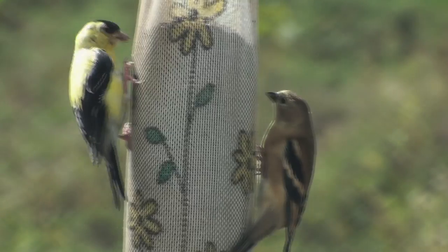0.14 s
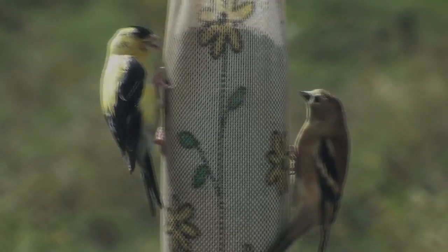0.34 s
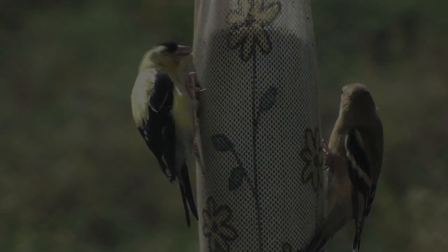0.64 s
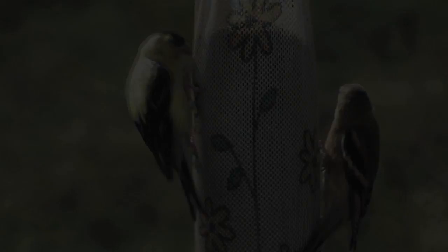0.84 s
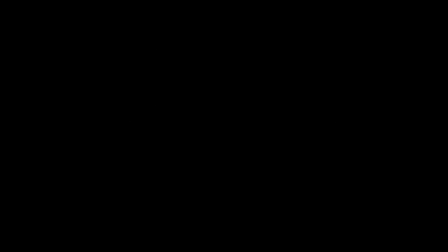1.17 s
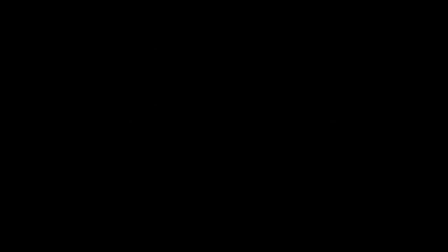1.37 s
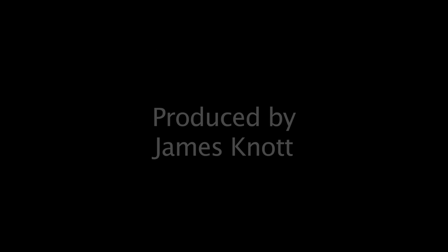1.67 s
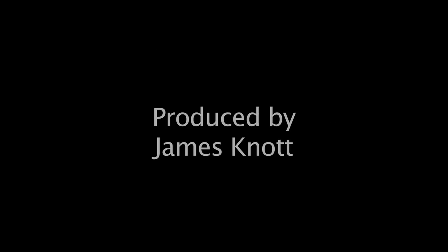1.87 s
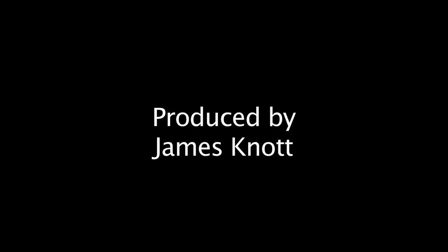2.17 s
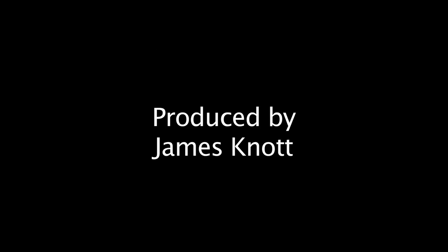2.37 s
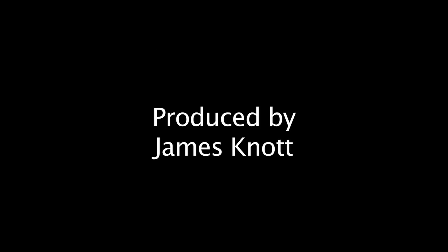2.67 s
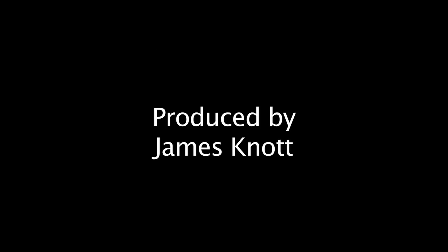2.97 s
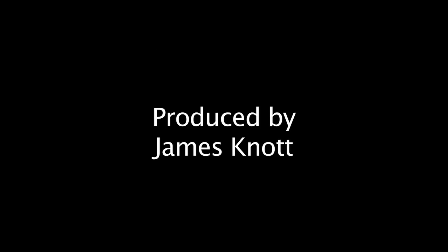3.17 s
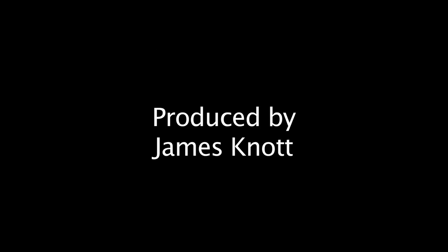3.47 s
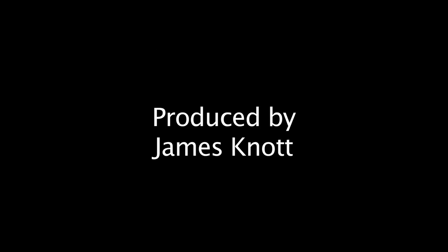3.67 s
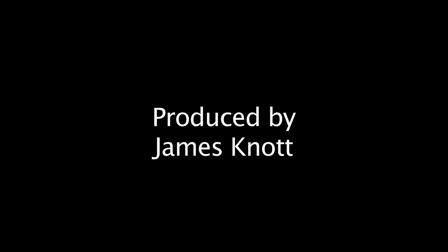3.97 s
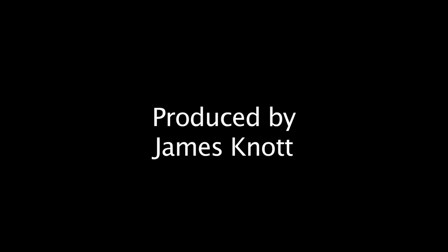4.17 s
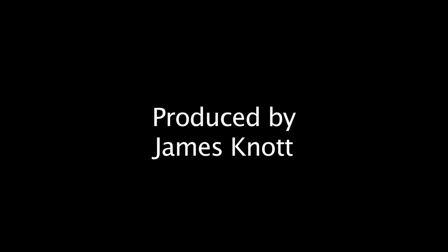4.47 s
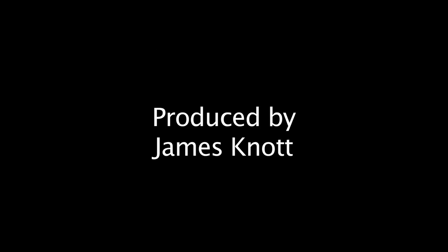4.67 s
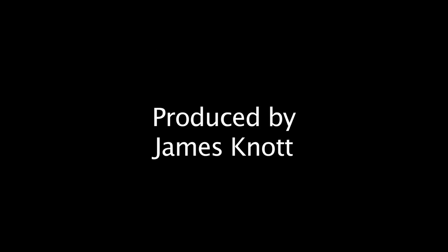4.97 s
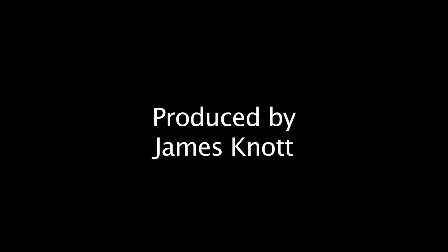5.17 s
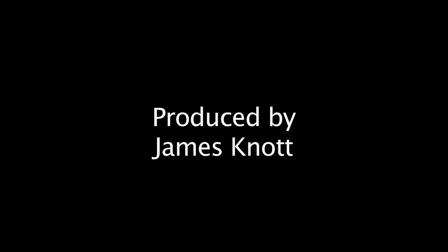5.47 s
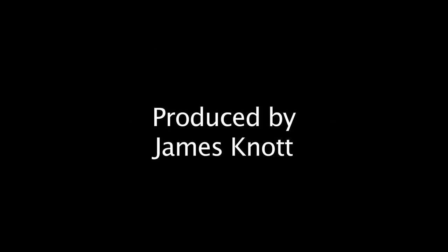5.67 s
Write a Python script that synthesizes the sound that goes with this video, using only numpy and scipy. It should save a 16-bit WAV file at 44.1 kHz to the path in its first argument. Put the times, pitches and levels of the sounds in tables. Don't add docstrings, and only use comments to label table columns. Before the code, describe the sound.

Summer meadow insects trill steadily while early wind buffets the microphone; wooden perch knocks, claw shuffling and brief finch calls follow.

```python
import sys
import numpy as np
from scipy import signal
from scipy.fft import rfft, irfft
from scipy.io import wavfile
from scipy.ndimage import uniform_filter1d

SR = 44100
rng = np.random.default_rng(int(sys.argv[2]) if len(sys.argv) > 2 else 0)


def how_loud(loudness_db):
    steps = np.asarray(loudness_db, float) / 20
    return 10 ** steps


def waveform_to_disk(signal):
    frames = np.transpose(np.atleast_2d(signal))
    scaled = np.clip(frames, -1, 1) * 32767
    samples = np.round(scaled).astype(np.int16)
    wavfile.write(sys.argv[1], SR, samples)


N = 256662
T = np.arange(N) / SR


def evened(x):
    return x / np.sqrt(np.mean(x ** 2) + 1e-20)


def add(mix, s, sound):
    part = mix[round(s * SR):][:len(sound)]
    part += sound[:len(part)]


def curve(table):
    return how_loud(np.interp(T, *np.transpose(table)))


def slow(length, size):
    return evened(uniform_filter1d(uniform_filter1d(rng.standard_normal(length), size), size))


def noise(shape, patchy_db, size):
    frames, hz = N // (size // 4) + 5, np.fft.rfftfreq(size, 1 / SR)
    a, b, patches = rng.standard_normal((frames, len(hz), 3)).T
    patches = uniform_filter1d(patches, size=5, axis=0)
    patches = evened(uniform_filter1d(patches, size=6, axis=1))
    f, db = np.transpose(shape)
    colour_db = np.interp(np.log(hz + 1), np.log(f + 1), db, left=-90, right=-90)
    z = (a + 1j * b) * how_loud(colour_db[:, None] + patchy_db * patches)
    return evened(signal.istft(z, nperseg=size, noverlap=size - size // 4)[1][:N])


def band(x, hz, width_hz):
    edges_hz = [hz - width_hz / 2, hz + width_hz / 2]
    return evened(signal.sosfilt(signal.butter(2, edges_hz, "band", fs=SR, output="sos"), x))


def phase(hz):
    return 2 * np.pi * np.cumsum(hz) / SR


def stroke(top_hz, rise_hz, lead_s, fall_hz, tail_s, shimmer):
    t = np.arange(-lead_s, tail_s, 1 / SR)
    swell_s = [-lead_s, .004 - lead_s, 0.29 * tail_s, 0.73 * tail_s, tail_s]
    swell = np.interp(t, swell_s, [0.093, 0.77, 1, 0.47, 0.092])
    hz = top_hz - np.where(t < 0, rise_hz * (t / lead_s) ** 2, fall_hz * (t / tail_s) ** 2)
    return swell * shimmer[:len(t)] * np.sin(phase(hz))


def stroke_times(rows, per_s):
    s = np.transpose(rows)[0]
    turns = np.cumsum(np.round(np.diff(s, prepend=s[0]) * per_s))
    return np.interp(np.arange(turns[-1] + 1), turns, s)


def crowd(per_s=70):
    out = np.zeros(N)
    for when, tune, force in rng.random((round(per_s * N / SR), 3)):
        chirp = stroke(7500 + 1150 * tune, 130, 0.0055, 660, 0.0118, np.ones(2000))
        add(out, when * N / SR, how_loud(4.0 * force) * chirp)
    return evened(out)


FADE_S = (1.0, 1.76)
# time in seconds, level in dB.
CHORUS = [(0, -48), (.32, -53), (1.1, -50), (1.78, -54), (2.28, -52), (4.21, -53), (4.85, -54.5),
          (5.32, -53), (5.82, -55.5)]
# frequency in Hz, level in dB.
NEAR_MEADOW = [(4000, -50), (6800, -23), (7750, 0.5), (8470, 1), (8780, 3.5), (9000, -20), (10000, -34),
               (13000, -72), (22000, -120)]
FAR_MEADOW = [(4000, -44), (6800, -2.5), (6890, -23), (7000, -11), (7500, 1.5), (8040, 4), (8550, 1.5),
              (9150, -17), (10000, -18), (13000, -20), (22000, -120)]
# start in seconds, end in seconds, level in dB.
FAINT = [
    (0, 1.1, -65),
    (4.3, 5.2, -73.5),
]


def chorus():
    second = np.interp(T, FADE_S, [0, 1])
    leader = 7
    beats = stroke_times((LOW_SONGS + HIGH_SONGS)[leader], STROKES_PER_S[leader])
    beat = np.interp(T, beats, np.arange(len(beats)))
    throb = how_loud(3.2 * np.cos(2 * np.pi * (beat - .5)))
    high = np.sqrt(1 - second) * evened(throb * noise(NEAR_MEADOW, 0.57, size=256))
    high += np.sqrt(second) * noise(FAR_MEADOW, 2.3, size=256)
    high = evened(high + .55 * crowd())
    low = band(rng.standard_normal(N), 4220, 460)
    faint, fade_db_per_s = 0, 17
    for start_s, end_s, db in FAINT:
        outside_s = np.maximum(np.maximum(start_s - T, T - end_s), 0)
        faint = faint + how_loud(db - fade_db_per_s * outside_s)
    return curve(CHORUS) * high + faint * low


# frequency in Hz, density in dB per Hz.
BUFFET = [(10, -24), (22, -1), (40, 1), (62, 2.5), (100, -3), (150, -11), (200, -22.5), (260, -52)]
FLUTTER = [(110, -7), (140, -1), (220, -7.5), (330, -10.5), (500, -16.5), (800, -23.5), (1200, -44)]
# time in seconds, level in dB.
BREEZE = [(0, -46), (1.15, -46), (1.4, -42.5), (1.7, -52), (2.4, -56.5), (3, -57), (3.66, -54),
          (4.0, -52.5), (4.25, -62.5), (4.9, -54), (5.7, -62)]
# centre in seconds, half width in seconds, peak in dB, flutter relative to it in dB.
GUSTS = [(0, 0.063, -36, -15.5), (.145, 0.055, -28.5, -10), (.27, 0.036, -31.5, -6),
         (0.391, 0.065, -30.5, -11), (.46, 0.08, -41, 1), (.54, 0.11, -34.5, -4.5), (.59, 0.021, -37, -3.5),
         (0.662, 0.058, -32.5, -1), (.74, 0.054, -32.5, -11.5), (.87, 0.032, -36, -11),
         (.92, 0.052, -32.5, -10), (.99, 0.05, -32.5, -11), (1.116, 0.044, -32, -8),
         (1.23, 0.028, -41, -11), (1.79, 0.047, -44, -11), (1.97, 0.16, -42, -8),
         (2.49, 0.03, -43.5, -14.5), (2.6, 0.064, -42.5, -11), (2.72, 0.049, -48, -21),
         (2.92, .04, -54.5, -10), (3.23, 0.13, -43, -15.5), (3.4, 0.064, -46.5, -19),
         (3.52, 0.059, -42.5, -28), (3.82, 0.045, -41, -17), (3.9, .1, -49, -14)]


def wind():
    lumps = how_loud(2.1 * evened(uniform_filter1d(rng.standard_normal(N), size=900)))
    buffet = noise(BUFFET, 1.5, size=4096)
    deep = signal.sosfilt(signal.butter(1, 45, fs=SR, output="sos"), buffet)
    buffet = buffet - np.interp(T, FADE_S, [.6, 0]) * deep
    flutter = evened(lumps * noise(FLUTTER, 2.04, size=1024))
    flutter_db, flutter_dies_db_per_s = -1, 4
    push = curve(BREEZE)
    shake = push * how_loud(flutter_db - flutter_dies_db_per_s * T)
    for s, half_s, db, gust_flutter_db in GUSTS:
        bell = how_loud(db) * np.exp(-((T - s) / half_s) ** 2)
        push = np.maximum(push, bell)
        shake = np.maximum(shake, how_loud(gust_flutter_db) * bell)
    return push * buffet + shake * flutter


# frequency in Hz, density in dB per Hz.
AIR = [(88, -35), (150, 0.5), (993, -3.5), (2960, -12.5), (3740, -9), (4720, -12), (5740, -11), (6970, -11),
       (7990, -5.5), (9710, -13.5), (15800, -12)]
RUSTLE = [(900, 8.5), (2000, 1.5), (3000, 2.5), (3700, -4), (5500, -8)]
# frequency in Hz, level in dB.
HUMS = [
    (120, -66),
    (1261, -75.5),
    (2523, -80.5),
    (3661, -77.5),
    (4253, -87),
]


def air():
    air_db, rustle_db = -57, -60.5
    drift = 1 + 0.00199 * slow(N, size=4000)
    hums = sum(np.sqrt(2) * how_loud(db) * np.sin(phase(hz * drift)) for hz, db in HUMS)
    leaves = how_loud(rustle_db) * np.sqrt(np.interp(T, FADE_S, [1, 0])) * noise(RUSTLE, 0.89, size=1024)
    return how_loud(air_db + 3) * noise(AIR, 0.88, size=1024) + leaves + hums


# top pitch in Hz, pitch rise in Hz, lead-in in seconds, pitch fall in Hz, tail in seconds.
WINGS = [(6573, 60, .015, 930, 0.0212), (6610, 350, .0091, 1120, 0.0172), (5956, 457, .014, 1250, .02),
         (6220, 160, 0.01, 750, 0.015), (6050, 150, .0082, 660, 0.0136), (7750, 290, 0.008, 760, 0.0157),
         (8180, 190, .009, 500, 0.018), (8630, 125, .008, 800, 0.0125), (8735, 140, .008, 780, 0.012),
         (8090, 390, 0.0098, 1030, 0.0114)]
STROKES_PER_S = [11.2, 18.6, 11.1, 18.9, 13.5, 17, 17.7, 17.85, 17.9, 9.1]
# time in seconds, peak in dB.
LOW_SONGS = [
    [(1.095, -54), (2.166, -47.5), (2.883, -48.5), (5.017, -48.5), (6.078, -55)],
    [(1.131, -51), (1.778, -46), (2.619, -45), (3.059, -47.5), (3.697, -45.5), (3.917, -45), (4.144, -56)],
    [(1.086, -59), (1.446, -50.5), (2.532, -50.5), (2.889, -50), (4.505, -49.5), (5.052, -50.5),
     (5.765, -52)],
    [(4.889, -73), (5.102, -51.5), (5.518, -52), (5.734, -48.5), (5.95, -59)],
    [(4.932, -52), (5.25, -58), (5.545, -55), (5.815, -56)],
]
HIGH_SONGS = [
    [(1.35, -53), (2.058, -51), (2.532, -65), (2.765, -51), (4.178, -50.5), (5.819, -54)],
    [(1.545, -49.5), (2.238, -47.5), (3.165, -51.5), (4.097, -49.5), (4.528, -59), (4.968, -53),
     (5.811, -60)],
    [(.024, -47.5), (.475, -39.5), (1.148, -43), (1.371, -46.5), (1.822, -58)],
    [(.048, -46), (.72, -42), (1.165, -47), (1.387, -47), (1.836, -59)],
    [(.04, -47), (.484, -41.5), (.921, -45), (1.36, -65), (1.8, -52)],
]
# time in seconds, top pitch in Hz, peak in dB.
STRAYS = [(4.178, 6400, -57), (4.305, 6100, -56), (4.423, 6400, -53), (4.437, 6350, -57),
          (4.535, 6300, -54), (5.604, 6100, -53), (5.783, 6420, -54)]


def crickets():
    out = np.zeros(N + SR)
    for (top_hz, *arch), per_s, rows in zip(WINGS, STROKES_PER_S, LOW_SONGS + HIGH_SONGS):
        times = stroke_times(rows, per_s)
        chance = rng.standard_normal((len(times), 2))
        shimmer = rng.standard_normal((len(times), 2000))
        shimmer = 1 + 2.6 * uniform_filter1d(shimmer, size=120, axis=1)
        for s, (tune, force), glint in zip(times, chance, shimmer):
            db = np.interp(s, *np.transpose(rows)) + 0.47 * force
            add(out, max(s - arch[1], 0), how_loud(db) * stroke(top_hz + 25 * tune, *arch, glint))
    _, *stray_arch = WINGS[3]
    for s, top_hz, db in STRAYS:
        add(out, s - stray_arch[1], how_loud(db) * stroke(top_hz, *stray_arch, np.ones(2000)))
    out = out[:N]
    return out + 0.15 * np.roll(out, round(0.012 * SR))


# start in seconds, length in seconds, centre in Hz, level in dB.
RASPS = [(0.037, 0.047, 9400, -63), (0.128, 0.048, 9100, -51), (.335, 0.063, 9500, -63),
         (.64, 0.064, 9400, -63), (0.84, 0.047, 9100, -53), (0.973, 0.054, 9500, -64),
         (1.194, 0.049, 8900, -47.5), (1.296, .05, 9450, -63)]


def katydid():
    out = np.zeros(N)
    for s, length_s, hz, db in RASPS:
        t = np.arange(0, length_s, 1 / SR)
        clicks = 0.32 + np.exp(-(t * 125 % 1) / 0.41)
        teeth = clicks * rng.standard_normal(9000)[:len(t)]
        add(out, s, how_loud(db) * band(teeth, hz, 500) * signal.windows.tukey(len(t), .3))
    return out


# time in seconds, peak in dB, pitch in Hz.
SLAPS = [(.115, -26, 90), (.137, -27.5, 80), (.267, -22, 84), (.38, -24, 59.7), (0.399, -26, 65),
         (0.434, -26.5, 143), (0.658, -24.5, 105), (0.696, -20.5, 119), (0.756, -29, 65.5),
         (.905, -24.5, 110), (0.99, -24.5, 96), (1.115, -23, 94)]


def slaps():
    out = np.zeros(N)
    for s, db, hz in SLAPS:
        cycles = np.arange(-1.5, 1.5, hz / SR)
        swing = np.exp(-(cycles / 0.58) ** 2) * np.cos(2 * np.pi * (cycles + 0.11))
        add(out, s - 1.51 / hz, -how_loud(db) * swing)
    return out


# time in seconds, peak in dB, low mode relative in dB, low mode in Hz, t60 in seconds.
KNOCKS = [(.695, -21.5, -1.5, 484, 0.038), (1.996, -50, 1, 470, 0.055), (2.028, -38, -5, 450, .03),
          (2.032, -30, -5, 440, 0.043), (2.065, -24.5, -7, 484, 0.042), (2.077, -42, -1, 430, 0.027),
          (2.092, -34.5, 4, 483, 0.049), (2.431, -30.5, -3, 492, 0.042), (2.441, -48, 10.5, 491, .06),
          (2.451, -48, 12, 498, 0.055), (3.071, -41.5, 3.5, 460, 0.035), (3.085, -46, 4, 500, .035),
          (3.095, -42, -8, 400, 0.038), (5.764, -42, -22, 520, .037), (5.783, -36.5, -19, 579, 0.074),
          (5.792, -39, -10, 560, 0.032), (5.796, -24, -6, 560, 0.036), (5.804, -32, -3, 520, 0.034),
          (5.809, -41.5, 7, 370, 0.029)]
# time in seconds, peak in dB, low mode relative in dB, low mode in Hz,
# upper-mode pitch as a ratio to usual.
RATTLE = [(3.836, -46, -6, 540, 1.05), (3.853, -43.5, 4, 385, .98), (3.897, -34, -5, 354, 0.96),
          (3.909, -40, 3, 437, 1), (3.923, -42, 1, 406, 0.97), (3.944, -43.5, 4, 400, 1.2),
          (3.962, -37.5, -1, 507, .98), (3.978, -41, -1, 400, 1.1), (3.999, -37.5, -6, 534, 1.07),
          (4.023, -44, 6, 382, 0.91), (4.054, -32.5, -2, 370, 1.1), (4.074, -47, 7, 447, 0.72),
          (4.087, -39.5, 1.5, 420, 1.08), (4.1, -49, 2, 400, 1.04), (4.141, -40.5, -1, 580, 1),
          (4.16, -43.5, 0, 430, 0.85), (4.18, -37.5, -4, 460, 1.02), (4.198, -51, 6, 400, 0.85),
          (4.214, -39.5, -7, 380, 1.1), (4.228, -50, 7, 420, 0.94), (4.25, -35, -9, 487, 1.02),
          (4.271, -50, 3, 475, .97)]
# pitch in Hz, level in dB, share of the ring time.
WOOD = [(660, -0.5, 0.61), (785, -0.5, 0.9), (878, -9, 0.76)]
# time in seconds, peak in dB, centre in Hz.
TICKS = [
    (0.6956, -23, 2890),
    (2.028, -41, 4860),
    (4.1795, -44, 4700),
    (4.331, -33.5, 5200),
    (5.78, -48, 1500),
    (5.7939, -34, 2800),
]


def perch():
    out, t = np.zeros(N), np.arange(round(.08 * SR)) / SR
    rattle_t60_s = 0.053
    taps = [(s, db, low_db, hz, rattle_t60_s, wood) for s, db, low_db, hz, wood in RATTLE]
    hits = sorted([(*knock, 1) for knock in KNOCKS] + taps)
    chance = rng.random((len(hits), len(WOOD) + 2, 2))
    for (s, db, low_db, low_hz, t60_s, wood), draws in zip(hits, chance):
        modes = [(wood * hz, d - 4.5, .002, share * t60_s) for hz, d, share in WOOD]
        modes += [(low_hz, low_db + 3.0, .004, t60_s), (0.792 * low_hz, low_db - 9.0, .004, t60_s)]
        for (hz, mode_db, rise_s, ring_s), (tune, turn) in zip(modes, draws):
            cycles = hz * (0.945 + 0.088 * tune) * (t - .0025) + 0.21 + 0.49 * (turn - .5)
            ring = np.sin(2 * np.pi * cycles) * how_loud(-60 * t / max(ring_s, .01))
            add(out, s, how_loud(db + mode_db) * (1 - np.exp(-(t / rise_s) ** 2)) * ring)
    for s, db, hz in TICKS:
        width_hz = 1.6 * min(hz, 3000)
        step = np.exp(-np.arange(400) / 0.32)
        snap = band(band(band(step, hz, width_hz), hz, width_hz), hz, 1.15 * width_hz)
        add(out, s, how_loud(db) * snap / abs(snap).max())
    return out


# time in seconds, pitch in Hz, level in dB.
LOWER = [
    [(.946, 2730, -62), (.954, 2900, -49.5), (.975, 3090, -44.5), (.995, 3220, -42), (1.023, 3390, -44.5),
     (1.048, 3410, -42), (1.054, 3620, -54), (1.061, 3800, -61)],
    [(2.798, 2720, -50), (2.81, 2926, -34), (2.832, 3134, -30.5), (2.85, 3210, -28.5), (2.88, 3440, -29),
     (2.9, 3475, -33), (2.906, 3630, -36.5), (2.913, 3920, -53)],
    [(2.663, 3810, -64), (2.67, 4030, -43), (2.678, 4180, -34.5), (2.697, 3990, -30), (2.708, 3545, -32.5),
     (2.72, 3490, -37), (2.727, 3820, -45), (2.732, 3800, -60)],
]
UPPER = [
    [(.968, 4500, -56), (.983, 4460, -49), (.997, 4600, -45.5), (1.025, 4830, -49), (1.045, 4840, -47.5),
     (1.051, 5200, -51), (1.057, 5450, -73)],
    [(2.809, 4270, -52), (2.822, 4560, -46), (2.838, 4520, -41), (2.853, 4740, -36), (2.875, 4900, -36.5),
     (2.903, 4980, -44), (2.912, 5180, -50)],
    [(2.667, 5000, -66), (2.674, 5460, -52), (2.68, 5870, -41), (2.696, 5680, -34.5), (2.713, 5100, -37),
     (2.721, 4930, -44), (2.729, 5300, -48)],
]
MIXES = [(2, 0), (1, 1), (3, 0), (0, 2), (2, 1)]
# one call, dB of each mix under the lower voice.
OVERTONES = [(-11, -38, -40, -45, -40), (-14, -35, -33, -50, -32), (-25, -22, -21, -30, -38)]
# upper-voice pitch wobble in Hz, breath in dB.
HOARSE = [(18, -32), (42, -32), (28, -33)]


def finch():
    out = np.zeros(N)
    for lower, upper, mix_db, (wobble_hz, breath_db) in zip(LOWER, UPPER, OVERTONES, HOARSE):
        (s, hz, db), (s2, hz2, db2) = np.transpose(lower), np.transpose(upper)
        t = np.arange(s[0], s[-1], 1 / SR)
        wobble, tremble, flutter = (slow(7000, size=70)[:len(t)] for _ in range(3))
        lo_hz, hi_hz = np.interp(t, s, hz), np.interp(t, s2, hz2)
        low = phase(lo_hz + 0.14 * wobble_hz * tremble)
        high = phase(hi_hz + wobble_hz * wobble)
        rasp = 1 + wobble_hz / 130 * slow(7000, size=55)[:len(t)]
        joins = np.interp(t, [s2[0], s2[0] + .004, s2[-1] - .004, s2[-1]], [0, 1, 1, 0])
        mixed = np.zeros(len(t))
        for (m, n), d in zip(MIXES, mix_db):
            swallowed_db = 10 * np.exp(-((m * lo_hz + n * hi_hz - 6950) / 330) ** 2)
            mixed += how_loud(d - swallowed_db) * np.sin(m * low + n * high) * (joins if n else 1)
        lower_db = np.interp(t, s, db)
        mixed *= how_loud(0.28 * (lower_db - db.max()))
        breath = how_loud(breath_db) * band(rng.standard_normal(7000), 3200, 4900)[:len(t)]
        call = how_loud(lower_db + 0.71 * flutter) * (np.sin(low) + mixed + breath)
        call += how_loud(np.interp(t, s2, db2) + 0.76 * tremble) * joins * rasp * np.sin(high)
        add(out, s[0], np.sqrt(2) * call * signal.windows.tukey(len(t), .05))
    return out + how_loud(-21) * np.roll(out, round(0.012 * SR))


# start in seconds, level in dB.
SWOOPS = [(1.689, -60), (2.742, -62), (3.817, -64), (5.495, -64)]
# length in seconds, start pitch in Hz, end pitch in Hz.
SWOOP = (0.073, 4600, 3500)
# start in seconds, length in seconds,
# start pitch in Hz, level in dB.
CHIPS = [(3.05, 0.04, 3550, -64), (3.065, 0.025, 3600, -61), (3.194, 0.044, 3500, -61),
         (3.205, 0.048, 3540, -58.5), (3.203, 0.034, 4600, -64), (3.218, .025, 4650, -66),
         (3.312, 0.047, 3460, -62), (3.324, 0.028, 3520, -61), (3.444, 0.036, 2780, -65),
         (3.455, .033, 2740, -64), (4.184, 0.034, 3300, -58), (4.198, 0.042, 3190, -64),
         (4.2, .026, 6050, -63), (4.218, .025, 5550, -60), (4.313, 0.034, 2850, -64),
         (4.295, .04, 3080, -61), (4.314, .024, 5500, -63)]
WHISTLES = [(1.828, 0.1, 3140, -62), (3.992, .062, 3270, -63.5), (5.652, .104, 3150, -63),
            (5.668, 0.07, 4690, -68), (3.995, .045, 4735, -70)]
# delay in seconds, level in dB.
ECHOES = [(.005, -14), (.013, -13), (.019, -18), (.03, -17)]


def far_birds():
    out = np.zeros(N)
    chip_octaves_per_s, whistle_octaves_per_s = -15.5, 1.35
    slides = [(s, *SWOOP, db, True) for s, db in SWOOPS]
    for calls, speed in (CHIPS, chip_octaves_per_s), (WHISTLES, whistle_octaves_per_s):
        for s, length_s, hz, db in calls:
            slides.append((s, length_s, hz, hz * 2 ** (speed * length_s), db, False))
    for s, length_s, from_hz, to_hz, db, level_ends in slides:
        u = np.linspace(0, 1, round(length_s * SR))
        if level_ends:
            u = (1 - np.cos(np.pi * np.clip(2.0 * u - .36, 0, 1))) / 2
        elif to_hz < from_hz:
            u = u ** 1.25
        tone = np.sin(phase(from_hz + (to_hz - from_hz) * u))
        add(out, s, np.sqrt(2) * how_loud(db) * tone * signal.windows.tukey(len(u), .55))
    out = out * how_loud(1.8 * slow(N, size=60) - .8)
    return out + sum(how_loud(db) * np.roll(out, round(s * SR)) for s, db in ECHOES)


def scene():
    mono = chorus() + wind() + air() + crickets() + katydid() + slaps() + perch() + finch() + far_birds()
    return np.array([mono, mono])


# block start in seconds, from Hz, to Hz.
SLIPS = [(1.62, 4150, 7580), (1.62, 8950, 11710), (1.782, 5170, 6890), (3.361, 6890, 8270),
         (3.361, 14470, 15850), (4.568, 6200, 7580), (4.568, 8270, 9650), (4.568, 11030, 12400),
         (5.335, 4480, 6200), (5.335, 8950, 10340), (5.335, 13090, 15160), (5.59, 9650, 11030),
         (5.59, 11710, 13090)]


def slipped(dry):
    out, hz = dry.copy(), np.fft.rfftfreq(2048, 1 / SR)
    window = signal.windows.kaiser_bessel_derived(2048, 4 * np.pi)
    for s, lo_hz, hi_hz in SLIPS:
        at = 764 + 1024 * round((s * SR - 764) / 1024)
        z = rfft(dry[:, at:at + len(window)] * window)
        loud = np.sqrt(uniform_filter1d(abs(z) ** 2, size=32, axis=1))
        fresh = loud * (rng.standard_normal(z.shape) + 1j * rng.standard_normal(z.shape))
        out[:, at:at + len(window)] += window * irfft((fresh - z) * (hz > lo_hz) * (hz < hi_hz))
    return out


def top_cut(x):
    return signal.sosfilt(signal.butter(12, 15720, fs=SR, output="sos"), x)


def record(dry):
    mix = slipped(dry)
    return top_cut(mix)


dry = scene()
out = record(dry)
waveform_to_disk(out)
```